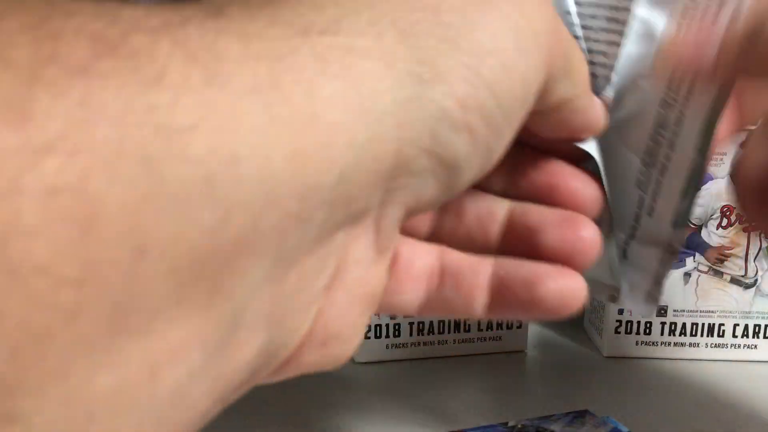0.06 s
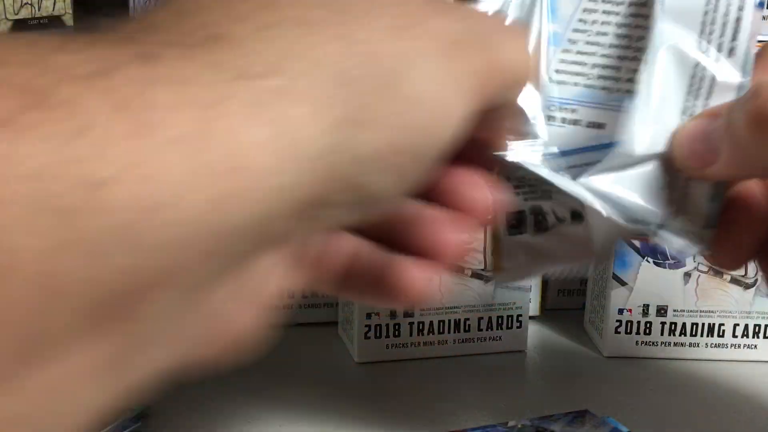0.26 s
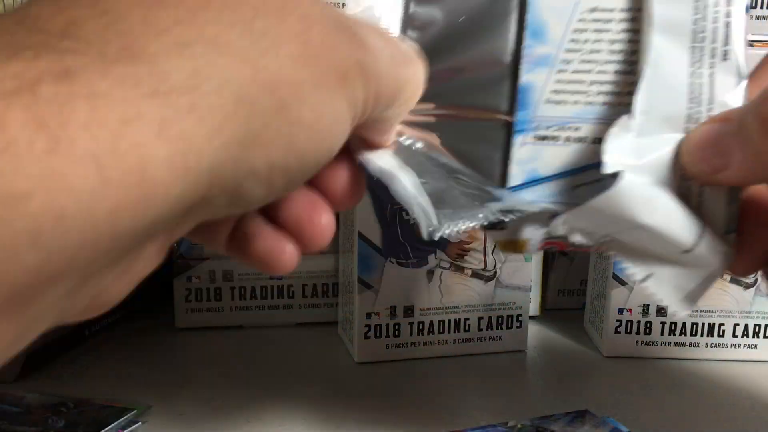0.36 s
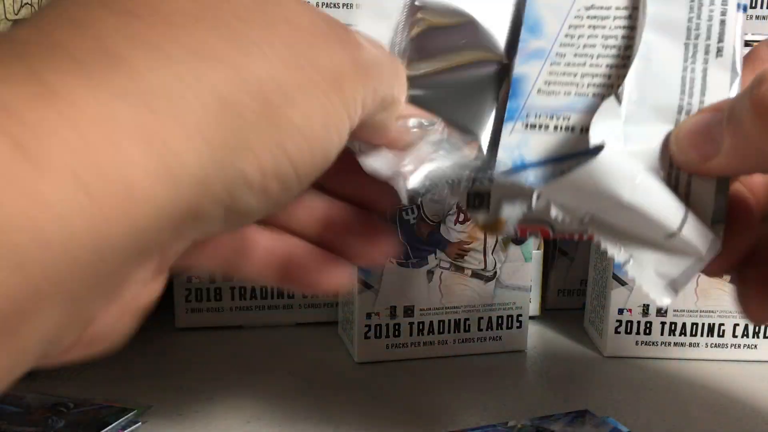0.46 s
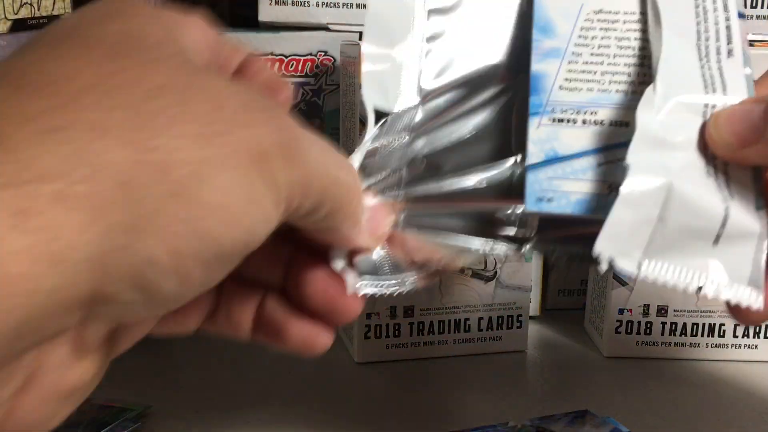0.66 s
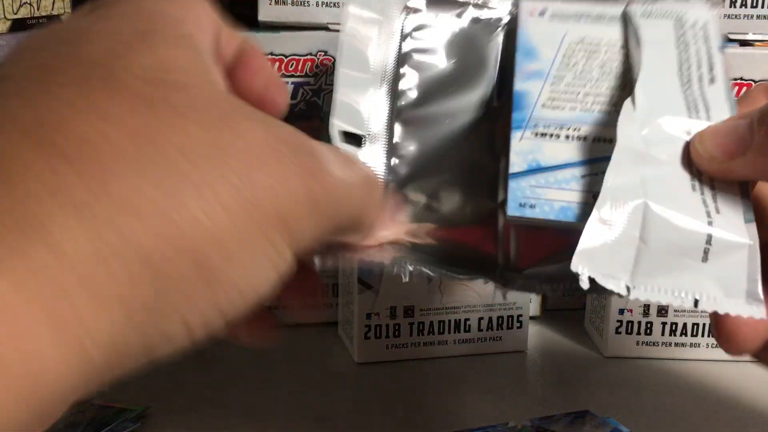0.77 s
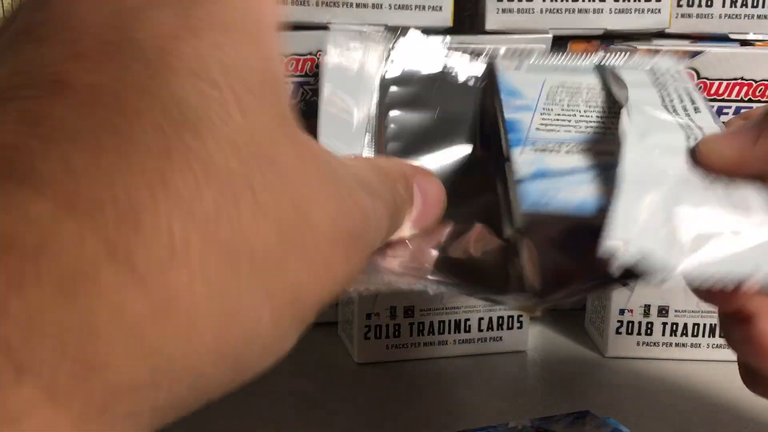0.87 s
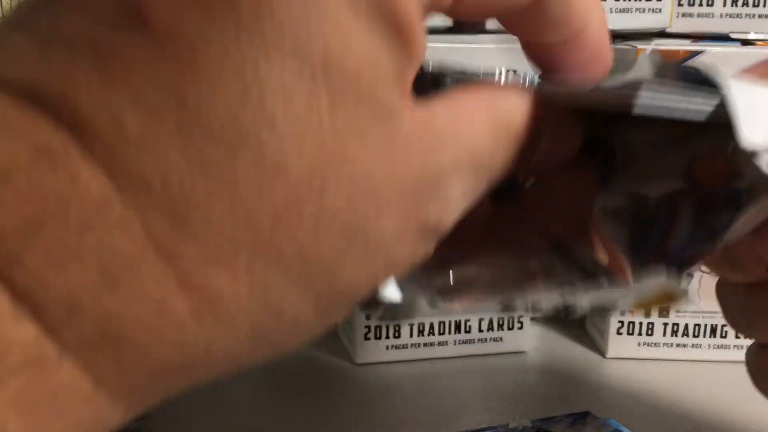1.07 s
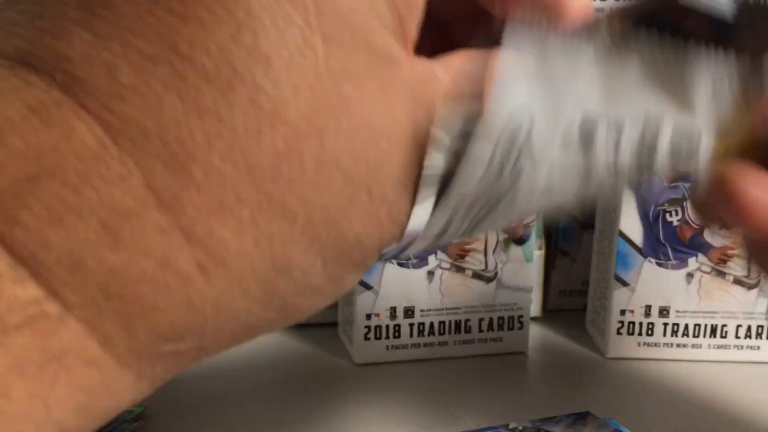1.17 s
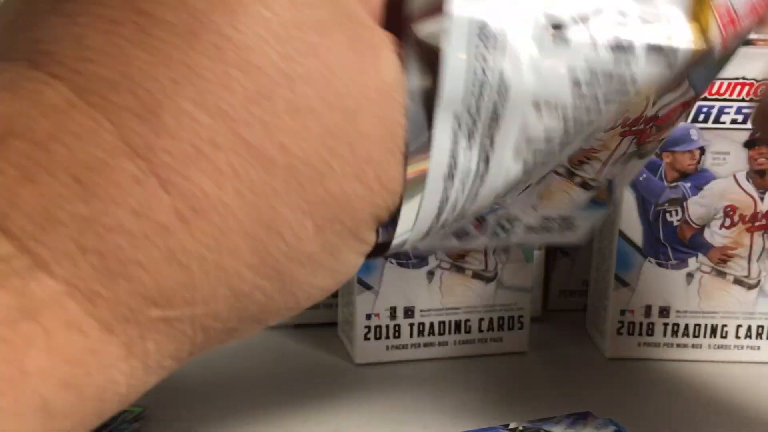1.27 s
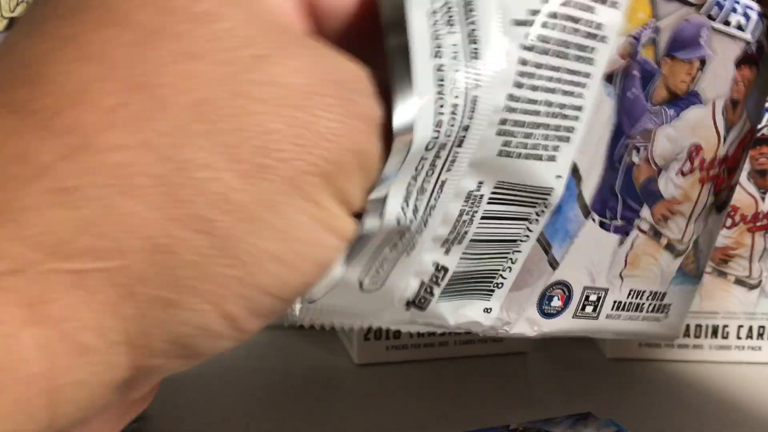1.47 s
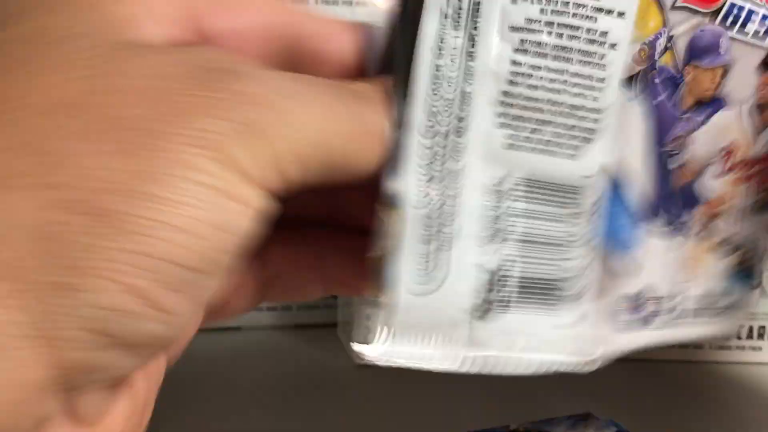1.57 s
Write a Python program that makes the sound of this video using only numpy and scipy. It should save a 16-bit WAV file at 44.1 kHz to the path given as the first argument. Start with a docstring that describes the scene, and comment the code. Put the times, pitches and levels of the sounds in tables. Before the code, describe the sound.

A foil card pack crinkles and rips open in two pulls, then rustles quietly, up close

```python
"""Two hands pull a foil card pack open and peel it back, close to the microphone in a small room.
Over a steady room tone the loose wrapper rustles throughout, as grainy noise with a drawn level.
Creases soon snap as band-split noise bursts, panels pop as brief rings and fingers bump as low thuds.
The sealed seam rips in two pulls of dense crackle. The table and the boxes around the pack
colour all the handling sounds and throw them back as echoes and a short tail."""
import sys
import numpy as np
from scipy import signal
from scipy.fft import rfft, irfft
from scipy.io import wavfile

SR = 44100
rng = np.random.default_rng(int(sys.argv[2]) if len(sys.argv) > 2 else 0)


def unload_wav(signal):
    """Save mono or channel-first audio to the path in sys.argv[1] as 16-bit WAV at rate SR, clipped to [-1, 1]."""
    wavfile.write(
        sys.argv[1],
        SR,
        np.round(np.clip(np.atleast_2d(signal).T, -1, 1) * 32767).astype(np.int16),
    )


N = 70560
T, HZ = np.arange(N) / SR, np.fft.rfftfreq(N, 1 / SR)
EVENT_S = 0.006  # a short event carries the energy of this long a sound at its stated rms level


def amp(db):
    """Decibels to gain."""
    return 10 ** (np.asarray(db) / 20)


def unit(x):
    """Scales to rms 1."""
    return x / np.sqrt(np.mean(x ** 2) + 1e-20)


def at_level(sound, db):
    """Scales a short event by its energy, so that long and short events compare."""
    return amp(db) * sound * np.sqrt(EVENT_S * SR / np.sum(sound ** 2))


def read(points, hz):
    """Reads a table on a log-frequency axis."""
    f, value = np.transpose(points)
    return np.interp(np.log(hz + 1), np.log(f), value)


def add(mix, s, sound):
    """Mixes a sound in at a time."""
    part = mix[max(round(s * SR), 0):][:len(sound)]
    part += sound[:len(part)]


def colour(x, db):
    """Causal minimum-phase filter with the given gain at each frequency."""
    cepstrum = irfft(np.log(amp(db)), N)
    # fold the cepstrum onto positive time, which makes the filter causal
    cepstrum[1:N // 2] *= 2
    cepstrum[N // 2 + 1:] = 0
    impulse = irfft(np.exp(rfft(cepstrum)), N)[:4096]
    return signal.oaconvolve(x, impulse)[:len(x)]


def room_tone():
    """A steady low rumble with faint hiss: noise shaped by frequency."""
    # room tone spectrum: hz, relative level_db (per Hz)
    tone_spectrum = [(25, -45), (48, -1), (80, -11), (150, -13.5), (400, -23), (1600, -26.5), (5000, -35.5),
                     (16000, -52)]
    level_db = -58
    spectrum = rfft(rng.standard_normal(N)) * amp(read(tone_spectrum, HZ))
    return amp(level_db) * unit(irfft(spectrum, N))


def crackle(per_s, spread_db, hiss):
    """Tiny fractures of uneven size, each a very short burst, over a fine hiss."""
    fracture_decay_s = 0.00065
    t, out = np.arange(0, 0.006, 1 / SR), np.zeros(N)
    kinds = rng.standard_normal(size=(16, len(t)))
    for noise in kinds:
        burst = unit(noise * np.exp(-t / fracture_decay_s))
        size = amp(spread_db * np.minimum(rng.exponential(1, N), 3.5))
        strikes = rng.random(N) < per_s / len(kinds) / SR
        out += signal.oaconvolve(size * strikes, burst)[:N]
    return unit(unit(out) + hiss * rng.standard_normal(N))


def rustle():
    """The loose wrapper flexes and slides under the fingers: uneven crackle with much hiss."""
    # rustling strength over time: time_s, level_db
    rustle_level = [(0, -48.5), (.03, -46.5), (.09, -56.5), (.18, -57.5), (.45, -38.5), (.51, -55.5),
                    (.6, -49.5), (.79, -48), (.855, -41), (.878, -55.5), (.92, -50.5), (.99, -55),
                    (1.05, -48), (1.17, -59.5), (1.205, -55), (1.235, -45.5), (1.28, -56.5), (1.335, -49),
                    (1.36, -81), (1.44, -60.5), (1.45, -51.5), (1.6, -55)]
    # rustle spectrum: hz, relative level_db (per Hz)
    rub_spectrum = [(40, -37), (150, -7.5), (400, 1), (900, 2.5), (1700, 3), (3500, -2.5), (6500, -5),
                    (10000, -8), (16000, -12.5)]
    grains = crackle(per_s=900, spread_db=8.5, hiss=0.73)
    grains = unit(colour(grains, read(rub_spectrum, HZ)))
    return grains * amp(np.interp(T, *np.transpose(rustle_level)))


def creases():
    """Each crease buckles in milliseconds of grainy cracking; the lowest band holds longest, the top shortest."""
    # creases buckling: start_s, level_db, then band offsets depth_db, body_db, sheen_db
    crease_events = [(0.0395, -38.5, -5.5, -0.5, -4), (0.0642, -38, -42, -37, -2.5),
                     (0.1119, -35.5, -9, -4, -5.5), (0.1902, -34.5, -6, -3.5, -1.5),
                     (0.2261, -24.5, -18, -9.5, -1), (0.2303, -28.5, -18, -3, 1), (0.241, -42, -7, 6.5, -1),
                     (0.251, -35.5, -1, -12, 3.5), (0.378, -22.5, -29, -2, -5.5),
                     (0.3878, -24.5, 0.5, 2, -10), (0.4172, -22, -1, 1, -8.5), (0.522, -38.5, -13, 1, -16),
                     (0.538, -35, -5.5, -1, -0.5), (0.5486, -36, -7.5, -6, -1), (0.5758, -36, -13, -9, -6),
                     (0.5923, -40, -17, -8, -1), (0.6185, -33.5, -24, -1, -7),
                     (0.6303, -34, -10.5, -4.5, -10), (0.6541, -31.5, -11, 5, -7.5),
                     (0.6635, -29, -2.5, 2, -12), (0.6734, -34.5, -0.5, 8.5, -11), (0.699, -39, 4.5, 6, 0),
                     (0.7152, -36, 3, -2, -1), (0.7265, -31.5, -3, 8, 3), (0.7333, -24, -7, -3.5, -14),
                     (0.747, -25, -5.5, -1, -1), (0.811, -37.5, -0.5, 2, -9), (0.8426, -40.5, -8, -10, 1),
                     (0.89, -35, -8, 3.5, 3.5), (0.9646, -42, -7, -8, -21), (1.0053, -33.5, -11, -2, -3),
                     (1.0234, -29, -29, -2, -5), (1.0858, -40, -9, -3.5, -5), (1.2148, -33, -14, -8.5, 0.5),
                     (1.296, -45, -7.5, -1, -16), (1.4573, -36, -15.5, 1.5, -0.5),
                     (1.4828, -47, -7, 8.5, -11), (1.5418, -42, -29, -8, -7.5), (1.58, -46, -10, 1.5, -13)]
    # edges of the depth, body, crack and sheen bands: hz
    band_edges_hz = [200, 780, 2200, 7000, 15500]
    # snap envelope, a row for each band from low to high: rise_s, hold_s, decay_s, gain_db
    snap_bands = [(0.00062, 0.0044, 0.0035, -1), (0.00054, 0.002, 0.0041, -2),
                  (0.00016, 0.0032, 0.0031, -2.5), (0.0006, 0.00083, 0.0037, -0.27)]
    grain_db, grain_s = 3, 0.0003086
    t, out = np.arange(0, 0.03, 1 / SR), np.zeros(N)
    bands = [signal.butter(N=3, Wn=edges, btype="band", fs=SR, output="sos")
             for edges in zip(band_edges_hz, band_edges_hz[1:])]
    for s, db, depth, body, sheen in crease_events:
        # one random roughness is shared by all the bands of a crease
        wobble = np.interp(t / grain_s, np.arange(len(t)), rng.standard_normal(len(t)))
        grain = amp(grain_db * wobble)
        offsets_db = (depth, body, 0, sheen)
        for band, offset_db, (rise, hold, decay, gain_db) in zip(bands, offsets_db, snap_bands):
            shape = np.minimum(t / rise, 1) * np.exp(-np.maximum(t - hold, 0) / decay)
            snap = signal.sosfilt(band, rng.standard_normal(len(t)) * grain * shape)
            add(out, s, at_level(snap, db + offset_db + gain_db))
    return out


def pops():
    """A flat foil panel flips and rings for a moment: one main mode among weaker neighbours."""
    # panels flipping over: start_s, level_db, pitch_hz
    pop_events = [(0.0465, -35, 3960), (0.1664, -39, 1300), (0.2285, -25.5, 3590), (.2292, -27.5, 6380),
                  (.2418, -31.5, 684), (.3485, -30, 1810), (.3635, -30, 1140), (0.4215, -25, 1036),
                  (0.4262, -21.5, 770), (.5225, -37.5, 1080), (0.5695, -38, 1210), (.6638, -29, 1005),
                  (.7472, -29, 900), (0.8843, -41, 900), (0.9505, -46, 1990), (1.0245, -34, 1020),
                  (1.2153, -36.5, 3624), (1.2158, -42.5, 674), (1.3291, -47, 3620)]
    rise_s, decay_s = 0.00049, 0.0019
    spread_octaves, side_db = 0.465, -8  # reach of the side modes each way, level of each one
    t, out = np.arange(0, 0.03, 1 / SR), np.zeros(N)
    shape = np.minimum(t / rise_s, 1) * np.exp(-t / decay_s)
    for s, db, hz in pop_events:
        offsets, phases = rng.random(size=(2, 6))
        # one side mode at random within each equal slice of the spread
        place = 2 * (np.arange(len(offsets)) + offsets) / len(offsets) - 1
        sides_hz = hz * 2 ** (spread_octaves * place)
        sides = np.sin(2 * np.pi * (np.outer(t, sides_hz) + phases)).sum(1)
        ring = shape * (np.sin(2 * np.pi * hz * t) + amp(side_db) * sides)
        add(out, s, at_level(ring, db))
    return out


def bumps():
    """Soft pushes of fingers on the stack of cards: a swing or two, longer when deeper."""
    # fingers bumping the pack: start_s, level_db, pitch_hz
    bump_events = [(.166, -47.5, 340), (.2, -48, 170), (0.403, -35, 124.7), (.421, -37, 100),
                   (.521, -38, 340), (0.541, -42.5, 200), (.695, -40, 85), (.728, -40, 170),
                   (.745, -36.5, 100), (1.022, -44.5, 168.7), (1.501, -42.5, 150), (1.508, -43, 70)]
    cycles_to_peak = 0.59
    t, out = np.arange(0, 0.1, 1 / SR), np.zeros(N)
    for s, db, hz in bump_events:
        swell = t * hz / cycles_to_peak
        thud = swell * np.exp(-swell) * np.sin(2 * np.pi * (hz * t + rng.random()))
        add(out, s, at_level(thud, db))
    return out


def seam():
    """The seal parts in a dense run of fractures; each pull has its own drawn level and brightness."""
    # the two pulls on the seam: time_s, level_db, brightness_db (treble against bass)
    first_pull = [(.195, -53, 5), (.207, -34, 2), (.222, -41, 8), (.245, -50, -7), (.272, -34.5, 3.5),
                  (.3, -38, -1), (.325, -31.5, -1), (.35, -25.5, 0), (.372, -25.5, -2.5), (.388, -27, 10),
                  (.398, -25.5, 1), (.407, -22.5, -4), (.423, -17.5, -3.5), (.431, -27.5, 4),
                  (.47, -70, 12)]
    second_pull = [(0.646, -43.5, -0.55), (0.67, -31, -1.4), (.69, -38.5, -2.4), (0.711, -38, 0.018),
                   (0.723, -39, -1), (0.734, -35.5, -1.2), (.752, -33.5, -0.55), (.775, -73, 0)]
    # ripping spectrum: hz, relative level_db (per Hz)
    rip_spectrum = [(60, -39), (300, -12), (750, 0), (1700, -2.5), (3000, -5), (6000, -7), (10000, -11.5),
                    (16000, -13.5)]
    split_hz = 2500  # brightness tilts the sound about here
    rip = crackle(per_s=1100, spread_db=1.5, hiss=0.34)
    rip = unit(colour(rip, read(rip_spectrum, HZ)))
    low = irfft(rfft(rip) / (1 + (HZ / split_hz) ** 4), N)
    high = rip - low
    out = np.zeros(N)
    for pull in (first_pull, second_pull):
        s, db, bright = np.transpose(pull)
        tilt = amp(np.interp(T, s, bright) / 2)
        pulling = (T > s[0]) * (T < s[-1])
        out += amp(np.interp(T, s, db)) * pulling * (low / tilt + high * tilt)
    return out


def room(x):
    """Nearby surfaces colour the sound; a few echoes and a short tail follow."""
    # peaks and dips of the space between table and boxes: centre_hz, width_hz, gain_db
    resonances = [(388, 37, 4), (489, 64, -7), (642, 110, 3), (1028, 72, 3.5), (1382, 180, -4.5),
                  (1665, 86, 7.5), (1863, 200, 5), (2117, 234, -8.5), (3187, 72, 2.5), (4000, 550, 3),
                  (4926, 267, -10), (5760, 220, 3.5), (7670, 320, -6.5), (10330, 290, -10)]
    # first reflections: delay_s, gain (linear)
    reflections = [(.0062, 0.099), (0.0124, 0.23), (.026, 0.075)]
    # room decay: hz, t60_s
    decay_times = [(150, 0.43), (600, 0.2), (1500, 0.2), (4000, 0.36), (9000, 0.43), (16000, 0.34)]
    tail_db, onset_s = -11, 0.0026
    x = colour(x, sum(db / (1 + (2 * (HZ - hz) / width) ** 2) for hz, width, db in resonances))
    # the tail is noise that fades at its own rate in each frequency band
    hz, t, z = signal.stft(rng.standard_normal(SR // 2), SR, nperseg=256)
    fade = np.exp(-np.log(1000) * t / read(decay_times, hz)[:, None])
    tail = signal.istft(z * fade, SR, nperseg=256)[1]
    tail *= np.minimum(T[:len(tail)] / onset_s, 1)
    tail *= amp(tail_db) / np.linalg.norm(tail)
    for delay, gain in reflections:
        add(tail, delay, np.array([gain]))
    return x + signal.fftconvolve(x, tail)[:N]


def scene():
    """The pack in the room, in mono, over the room tone."""
    pack = rustle() + creases() + pops() + bumps() + seam()
    return (room_tone() + room(pack))[None]


def record(dry):
    """The recorder's band limit: a steep low-pass."""
    cutoff_hz = 15950
    lowpass = signal.firwin(401, cutoff_hz, window=("kaiser", 8), fs=SR)
    return signal.oaconvolve(dry, lowpass[None], "same")


dry = scene()
out = record(dry)
unload_wav(out)
```